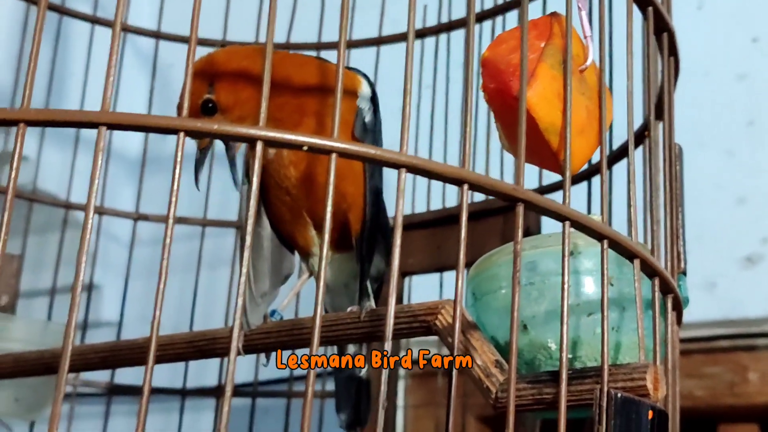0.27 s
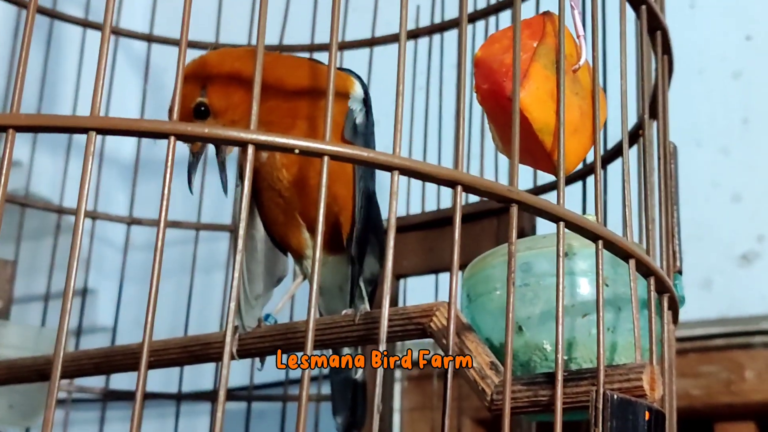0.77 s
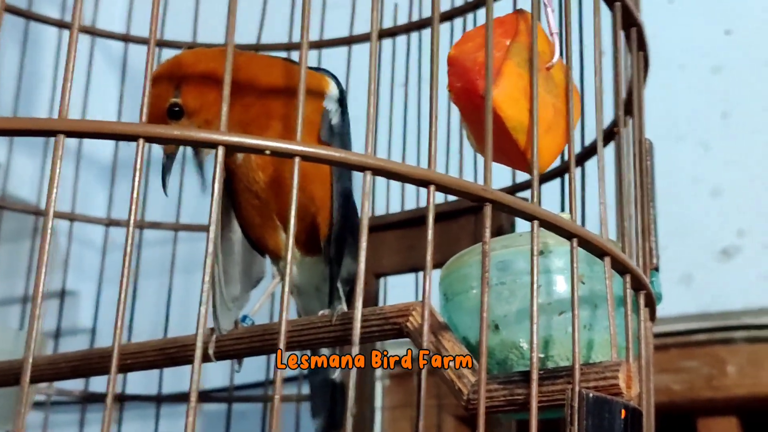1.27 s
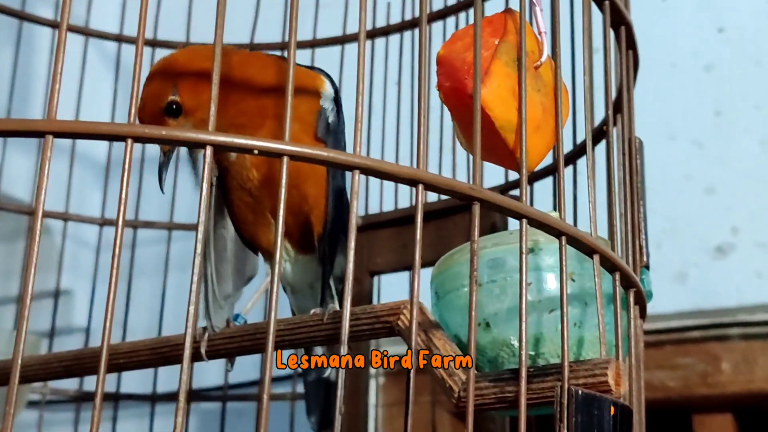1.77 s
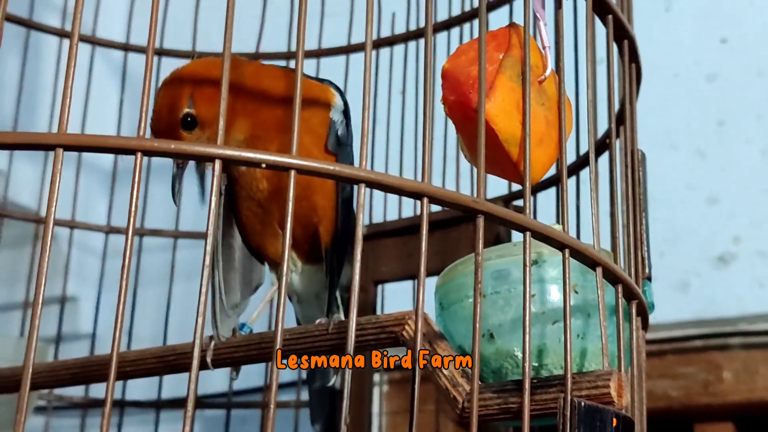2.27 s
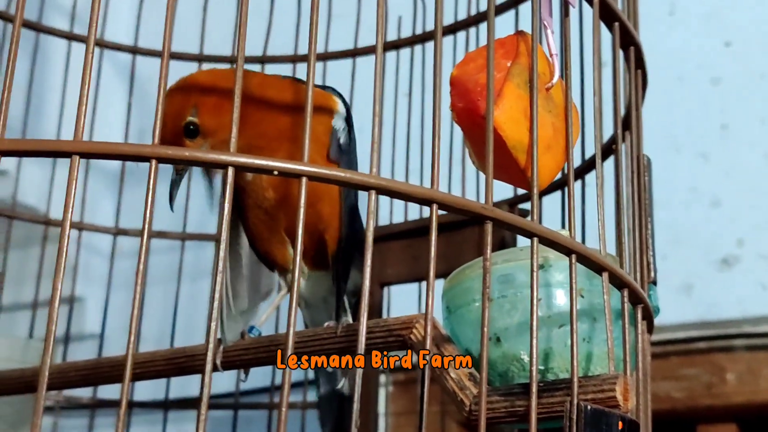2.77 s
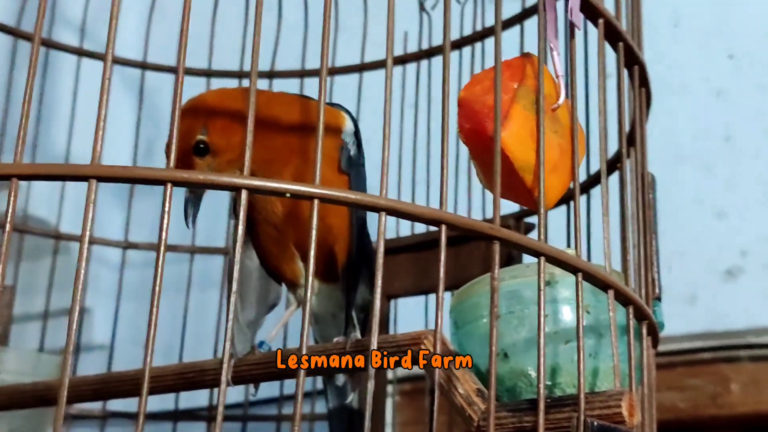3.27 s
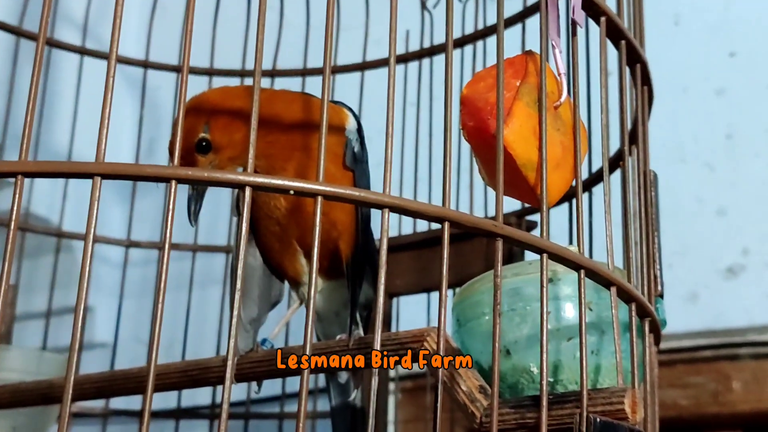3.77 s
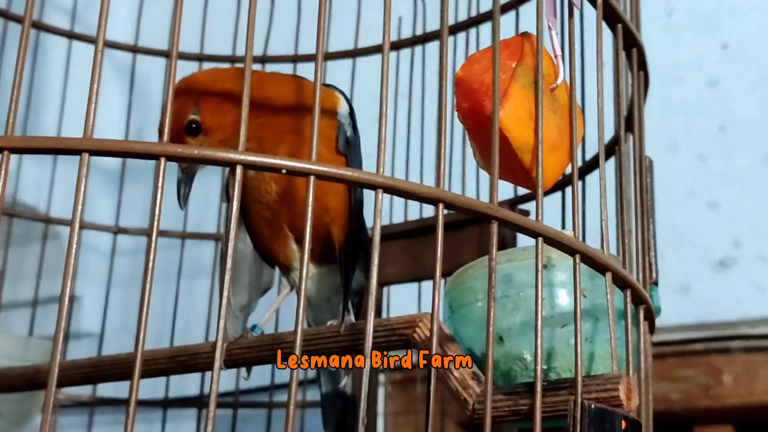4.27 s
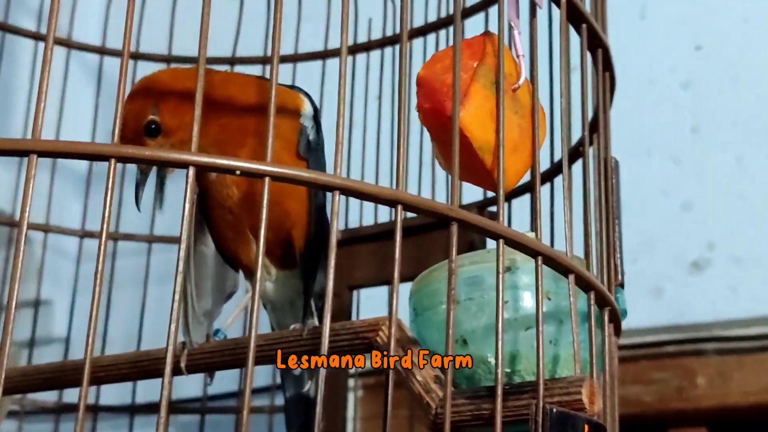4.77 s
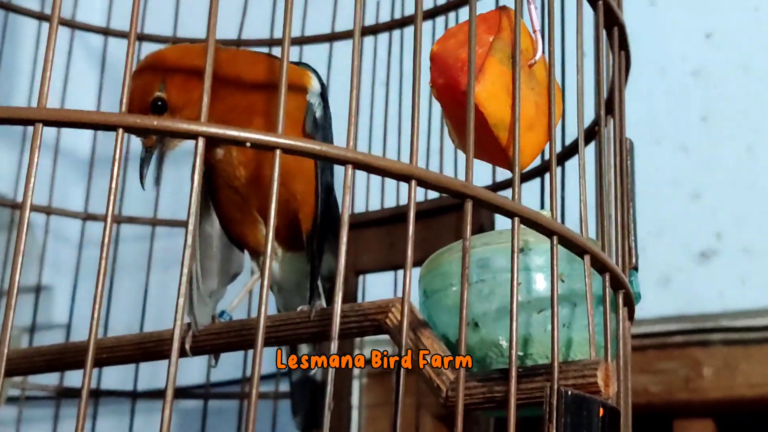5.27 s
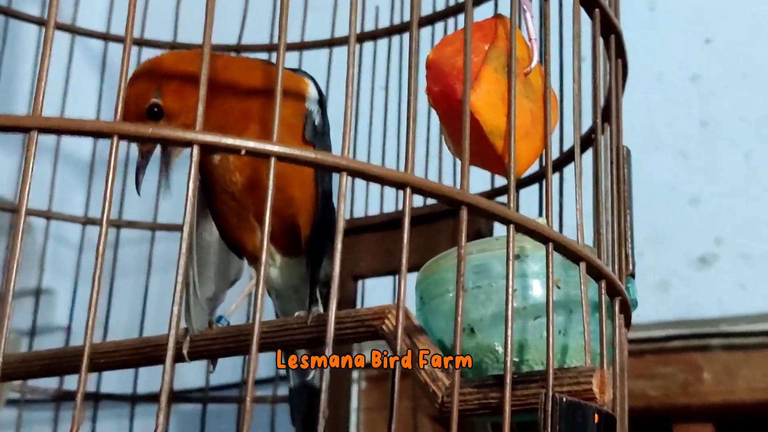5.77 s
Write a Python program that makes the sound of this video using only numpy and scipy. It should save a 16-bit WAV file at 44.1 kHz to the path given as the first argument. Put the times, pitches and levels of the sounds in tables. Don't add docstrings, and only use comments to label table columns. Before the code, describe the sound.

Loud, sharp thrush song with gaps: sliding whistles, quick clicking chips, warbled buzzes and husky downward slurs, with a short hard-room ring.

```python
import sys
import numpy as np
from scipy import signal
from scipy.fft import rfft, irfft, next_fast_len
from scipy.io import wavfile
from scipy.ndimage import uniform_filter1d, minimum_filter1d

SR = 44100
rng = np.random.default_rng(int(sys.argv[2]) if len(sys.argv) > 2 else 0)


def unload_wav(signal):
    wavfile.write(
        sys.argv[1],
        SR,
        np.round(np.clip(np.atleast_2d(signal).T, -1, 1) * 32767).astype(np.int16),
    )


def linear_from_db(decibels):
    return 10 ** (np.asarray(decibels, float) / 20)


N = 265702
RUN_IN = SR // 10

# time_s, pitch_hz, effort_db
SLUR = [(0, 4070, -30), (.018, 3970, -12.5), (.035, 3780, -12.5), (.085, 3560, -12.5), (.135, 3330, -10),
        (.182, 3286, -9.5), (.207, 2980, -13.5), (.221, 2300, -23)]
LEVEL_SLUR = [(0, 4150, -25.5), (.012, 3920, -11), (.053, 3670, -12.5), (.093, 3510, -11.5),
              (.133, 3362, -10), (.178, 3300, -9.5), (.208, 3200, -12), (.228, 2900, -24.5)]
KINKED_SLUR = [(0, 4090, -25.5), (.011, 3767, -16.5), (.021, 3782, -12), (.033, 3523, -14),
               (.09, 3333, -8.5), (.14, 3330, -9.5), (.175, 3195, -7.5), (.192, 3112, -19)]
# time_s, pitch_hz, effort_db
THIN_VOICE = [(0, 7780, -17.5), (.04, 7890, -27), (.077, 7480, -14)]
BEATING_VOICE = [(0, 6828, -22), (.03, 7060, -3), (.065, 6820, -18.5)]
# time_s, pitch_hz, effort_db
PEEP = [(0, 4760, -13.5), (.02, 4840, -0.5), (.036, 4720, -7.5), (.05, 4460, -8.5)]
HOOK = [(0, 3650, -11.5), (.012, 3950, -7), (.03, 4190, -0.5), (.047, 4120, -4), (.062, 3500, -6),
        (.082, 2434, -17.5)]
SHORT_HOOK = [(0, 4200, -7.5), (.012, 4350, -10.5), (.037, 4330, -1.5), (.047, 4150, -4), (.058, 3540, -3),
              (.069, 2800, -17.5)]
BUZZ = [(0, 3925, -22), (.012, 4226, -13), (.045, 4286, -5.5), (.09, 4390, -2), (.125, 4400, -19)]
RATTLE = [(0, 6390, -18.5), (.012, 5730, -9), (.037, 5694, -3.5), (.067, 6160, -6.5), (.094, 6570, -10.5)]
# time_s, pitch_hz, effort_db
GASP = [(0, 3050, -35), (.02, 2786, -33.5), (.045, 2700, -37)]
# time_s, pitch_hz, effort_db
RISE = [(0, 6190, -20.5), (.012, 6535, -4.5), (.033, 6950, -5.5), (.038, 7700, -16)]
DROP = [(0, 6140, 0.5), (.004, 5150, -22), (.008, 3190, -22)]
LONG_WHISTLE = [(0, 9100, -14), (.012, 8600, -10), (.029, 7964, -3.5), (.074, 7672, -4), (.114, 7540, -7),
                (.142, 7410, -16.5)]
DIVE = [(0, 7383, -12.5), (.023, 6878, -3.5), (.063, 6314, -5.5), (.103, 5900, -11), (.123, 5660, -9.5),
        (.135, 4577, -10.5), (.149, 3232, -16)]
SCOOP = [(0, 3220, -10), (.02, 2882, -0.5), (.055, 2890, -5), (.075, 3984, 4), (.105, 4704, -13.5),
         (.145, 5130, -16), (.18, 5200, -28.5)]
# time_s, pitch_hz, effort_db
UPSTROKE = [(0, 4790, -10.5), (.004, 6910, -13.5), (.008, 7300, -17.5)]
TICK = [(0, 7150, -20), (.002, 7294, -15.5), (.004, 7500, -25.5)]
DOWNSTROKE = [(0, 6820, -0.5), (.01, 7540, -6), (.018, 5660, -8), (.027, 4620, -4.5)]
ARCH = [(0, 4565, -9), (.007, 6400, -16), (.013, 7150, -3), (.019, 6520, -9.5), (.025, 5090, -1),
        (.033, 3500, -14.5)]
VEE = [(0, 6830, -28), (.0025, 5820, -7), (.0055, 3773, -12.5), (.009, 3594, -10.5), (.013, 4500, -20),
       (.018, 5300, -12.5)]
FLICK = [(0, 4290, -27), (.018, 4330, -13), (.06, 4401, -9), (.088, 4405, -6.5), (.11, 4640, -3),
         (.127, 5450, -11.5)]


def at_hz(points, hz):
    table_hz, value = np.transpose(points)
    return np.interp(np.log(hz + 1), np.log(table_hz), value)


def rms_one(x):
    return x / np.sqrt(np.mean(x ** 2) + 1e-20)


def lowpass(x, order, hz):
    return signal.sosfilt(signal.butter(order, hz, fs=SR, output="sos"), x)


def wobble(size, hz):
    return rms_one(lowpass(rng.standard_normal(size + 2000), 2, hz)[2000:])


def warble(pitch, t, share):
    # one_dip_s, rate_hz, depth_at_start (share of pitch), depth_at_end (share of pitch)
    warbles = [
        (1.743, 71, 0.074, 0.055),
        (4.6191, 52.5, 0.13, 0.034),
        (4.7742, 55.1, 0.035, 0.083),
    ]
    for dip_s, rate_hz, first, last in warbles:
        if t[0] < dip_s < t[-1]:
            turn = 2 * np.pi * rate_hz * (t - dip_s)
            skewed_turn = turn / 2 + 0.25 * (1 - np.cos(turn))
            dips = 1 - 2 * abs(np.sin(skewed_turn)) ** 1.3
            pitch = pitch * (1 - (first + (last - first) * share) * dips)
    return pitch


def partial(k, db, pitch, phase):
    # frequency_hz, gain_db
    throat_gain = [(2000, -16.5), (3300, -16), (4300, -11.5), (5500, -1.5), (6800, -0.5), (8500, -8.5),
                   (11500, -15.5), (15500, -13)]
    audible = k * pitch < 0.4 * SR
    return linear_from_db(db + at_hz(throat_gain, k * pitch)) * np.sin(k * phase) * audible


def note(gesture, start_s, stretch, ratio, level_db, upper_db, half_db=(), half_from=0, fade_db=0, rough=0):
    time_s, pitch_hz, effort_db = np.transpose(gesture)
    s = start_s + stretch * (time_s - time_s[0])
    length_s = s[-1] - s[0]
    t = np.arange(round(s[0] * SR), round(s[-1] * SR)) / SR
    share = (t - s[0]) / length_s
    effort = level_db + np.interp(t, s, effort_db)

    pitch = ratio * np.interp(t, s, pitch_hz)
    pitch = uniform_filter1d(pitch, size=1 + int(0.07 * len(t)), mode="nearest")
    pitch = warble(pitch, t, share)
    shake = wobble(SR // 3, 420)[:len(t)]
    flutter = wobble(SR // 3, 150)[:len(t)]
    phase = 2 * np.pi * np.cumsum(pitch * (1 + 0.19 * rough * shake)) / SR

    dulling, breakup_db = 0.1, 1.28
    tilt_db = dulling * (effort - effort.max()) + breakup_db * shake
    tone = 0
    for k, db in enumerate((0, *upper_db)):
        tone = tone + partial(k + 1, db + k * tilt_db, pitch, phase)

    doubling = linear_from_db(fade_db * share) * np.clip((share - half_from) / 0.03, 0, 1)
    for k, db in enumerate(half_db):
        tone = tone + doubling * partial(k + 0.5, db, pitch, phase)

    attack_s, release_s = 0.0016, min(0.0011, 0.34 * length_s)
    opening = np.minimum((t - s[0]) / attack_s, (s[-1] - t) / release_s)
    edges = np.sin(np.pi / 2 * np.clip(opening, 0, 1)) ** 2
    return tone * edges * linear_from_db(effort + 1.19 * flutter)


def thrush():
    # upper_db
    # (partials 2-4), half_db (lines at .5-3.5 x pitch), half_from (share of note), fade_db (of half lines),
    # rough (hoarseness), air_db (under the tone)
    songs = [
        (SLUR, dict(upper_db=(-3.5, -12, -7), half_db=(-14, -9.5, -18, -3), half_from=0.12, fade_db=-23, rough=0.021, air_db=-22.5), [(.165, 1.07, 0.98, 0)]),
        (LEVEL_SLUR, dict(upper_db=(-2.5, -7, -5), half_db=(-11.5, -6.5, -13, -3.5), half_from=.05, fade_db=-31.5, rough=0.027, air_db=-19.5), [(.567, 1.0, 0.99, 0)]),
        (KINKED_SLUR, dict(upper_db=(-4, -5, -4), half_db=(-9, 3, 1, 3), half_from=0.053, fade_db=-92, rough=.04, air_db=-20), [(5.113, 1.02, .99, 0.057), (5.462, .99, 1.01, 0)]),
        (THIN_VOICE, dict(upper_db=(-28,), rough=0.0799, air_db=-9), [(5.165, .98, 1.0, 0.5), (5.51, 1.03, 1.0, -3)]),
        (BEATING_VOICE, dict(upper_db=(-3,), rough=0.035, air_db=-39.5), [(5.225, 0.77, 0.91, 0), (5.588, .9, .99, 1)]),
             (PEEP, dict(upper_db=(-11.5, -14.5), half_db=(-36.5, -41, -34), half_from=0.43, fade_db=6, air_db=-38), [(.87, 0.82, 1.013, -13.5, 9.5), (1.025, 1.2, 0.98, -2, 11), (5.787, 0.94, 1.042, 1, -25), (5.908, 1.13, .96, 1.5, -6.5)]),
        (HOOK, dict(upper_db=(-19, -13, -27), rough=0.022, air_db=-25), [(1.28, 1.046, 1.0, 2, 5), (1.418, 1.02, .985, 2.5, -5.5)]),
        (SHORT_HOOK, dict(upper_db=(-18.5, -9.5, -17), rough=0.0101, air_db=-22), [(1.153, 0.98, 1.0, 0, 0.015)]),
        (BUZZ, dict(upper_db=(-20.5, -23.5, -30), rough=.03, air_db=-20), [(4.575, 0.95, 0.98, 0.5, .1), (4.747, 0.63, 0.81, -3, .1)]),
        (RATTLE, dict(upper_db=(-4,), half_db=(-25.5, -45), half_from=.2, fade_db=-10, rough=.03, air_db=-29), [(1.718, 0.91, 1.0, 0.013, 0)]),
             (RISE, dict(upper_db=(-4.5,), rough=.05, air_db=-34.5), [(1.577, 1.0, 1.0, 0)]),
        (DROP, dict(upper_db=(2.5, -3.5, -3), air_db=-28.5), [(1.615, 0.98, 0.92, 0.011)]),
        (LONG_WHISTLE, dict(upper_db=(-5.5,), rough=0.0092, air_db=-56), [(1.926, 1.0, 1.0, 0.0072)]),
        (DIVE, dict(upper_db=(-6.5, -23, -23), air_db=-38.5), [(2.187, 1.0, 1.0, 0.0059)]),
        (SCOOP, dict(upper_db=(-34, -45, -33), air_db=-18.5), [(2.335, 1.0, 1.0, 0.003)]),
             (UPSTROKE, dict(upper_db=(-7,), air_db=-16.5), [(2.528, 2.24, 1.03, -2), (2.767, 1.5, 1.03, 1.8)]),
        (TICK, dict(upper_db=(-6,), rough=.03, air_db=-14.5), [(2.793, 1.66, 0.81, 13), (2.856, 1.0, 1.05, 3), (2.939, 1.1, 1.03, 5), (4.601, 2.7, 0.685, -2)]),
        (TICK, dict(upper_db=(-29,), rough=0.057, air_db=-26.5), [(2.689, 3.0, .5, 8)]),
             (DOWNSTROKE, dict(upper_db=(-2, -13), rough=0.046, air_db=-11), [(2.547, 1.0, 0.93, 0.0058, 0.0051)]),
        (ARCH, dict(upper_db=(-6, -8.5, -12), rough=0.097, air_db=-6.5), [(2.655, 0.97, 0.99, 0, 0.0051)]),
        (VEE, dict(upper_db=(2, -5.5, 4.5), rough=0.1, air_db=-17), [(2.785, 0.72, 1.0, 1.5, .1), (2.868, 0.84, 1.04, 2.5, .1), (2.95, 0.9, 1.03, 0.5, .1), (3.037, .9, 1.0, -2, .1), (3.128, 1.05, 1.016, -2, .1)]),
        (FLICK, dict(upper_db=(-15.5, -12), half_db=(1, -13, -7.5, -15), half_from=0.013, fade_db=-5, rough=.01, air_db=-19.5), [(4.911, 0.97, 0.99, 0, 0)]),
        (PEEP, dict(upper_db=(-3, -8), half_db=(-5.5, -13), half_from=.01, fade_db=-5.5, rough=0.2, air_db=-9), [(-0.055, .85, 1.06, -5.5)]),
        (GASP, dict(upper_db=(-7,), rough=0.49, air_db=11.5), [(1.915, 0.95, 0.92, 0, 0)]),
    ]
    # frequency_hz, gain_db
    air_color = [(1500, -26), (2500, -8), (3500, -12), (4600, -26.5), (6000, -4), (7500, 0.1), (9000, -15),
                 (11000, -7.5), (13500, -2.5), (16000, -3)]
    tones, air = np.zeros((2, N + RUN_IN))
    for gesture, voice, sung in songs:
        tone_voice = {name: value for name, value in voice.items() if name != "air_db"}
        for start_s, stretch, ratio, level_db, *extra_air_db in sung:
            tone = note(gesture, start_s, stretch, ratio, level_db, **tone_voice)
            at = round(start_s * SR) + RUN_IN
            tones[at:at + len(tone)] += tone
            breath = uniform_filter1d(abs(tone), size=60)
            air[at:at + len(tone)] += linear_from_db(voice["air_db"] + sum(extra_air_db)) * breath
    size = next_fast_len(len(air))
    color = linear_from_db(at_hz(air_color, np.fft.rfftfreq(size, 1 / SR)))
    rush = irfft(rfft(rng.standard_normal(size)) * color, size)
    return tones + air * rms_one(rush)[:len(air)]


def room(x):
    # frequency_hz, t60_s
    decay_t60 = [(2000, 0.39), (4000, 0.36), (7000, .33), (11000, 0.31), (15000, 0.26)]
    # frequency_hz, gain_db
    left_shade = [(2200, -3), (3200, 1), (4500, -8.5), (6500, -10.5), (9000, -7.5), (12000, -6),
                  (15000, -9.5)]
    # frequency_hz, lead_rad
    left_turn = [(500, 1.1), (2100, 2.05), (3200, 1.9), (4700, 4.43), (8000, 8.35), (12000, 13.25),
                 (16000, 16.1)]
    tail_db, left_tail_db, first_echo_s = -1.5, -1, 0.0011
    t = np.arange(SR // 2) / SR
    white = rng.standard_normal((2, len(t)))
    tail = 0
    edges = np.geomspace(1200, 19000, 9)
    for low, high in zip(edges, edges[1:]):
        band = signal.sosfilt(signal.butter(2, [low, high], "band", fs=SR, output="sos"), white)
        tail = tail + band * linear_from_db(-60 * t / at_hz(decay_t60, np.sqrt(low * high)))
    tail = tail * np.clip(t / first_echo_s - 1, 0, 1)
    tail = tail / np.sqrt(np.sum(tail ** 2, 1, keepdims=True))
    tail = tail * linear_from_db([[tail_db + left_tail_db], [tail_db]])

    size = next_fast_len(len(x) + len(t))
    hz = np.fft.rfftfreq(size, 1 / SR)
    lead = np.exp(1j * np.interp(hz, *np.transpose(left_turn)))
    paths = rfft(tail, size) + [lead, np.ones_like(lead)]
    paths[0] *= linear_from_db(at_hz(left_shade, hz))
    return irfft(rfft(x, size) * paths, size)[:, RUN_IN:RUN_IN + N]


def hum():
    # frequency_hz, level_db (rms)
    hum_lines = [(177.6, -74.5), (247.6, -62.5), (285.3, -67.5), (323.0, -68.5), (355.3, -70.5),
                 (1324, -110)]
    t = np.arange(N) / SR
    total = np.zeros(N)
    for hz, db in hum_lines:
        level = linear_from_db(db + 2.0 + 2.4 * wobble(N, 2.2))
        total += level * np.sin(2 * np.pi * hz * t + 1.5 * wobble(N, 3.0))
    return total


def hiss():
    # frequency_hz, level_db (per Hz)
    floor_color = [(12, -37.5), (20, 7), (120, -14.5), (168, -17.5), (216, -15), (248, -12), (399, -17),
                   (434, -19), (660, -19.5), (1960, -26), (4180, -32.5), (5530, -37.5), (7110, -31),
                   (8410, -46.5), (16000, -37)]
    # frequency_hz, likeness (0-1)
    port_likeness = [(60, 0.093), (130, 0.93), (290, 0.66), (640, 0.24), (1400, 0.012)]
    hz = np.fft.rfftfreq(N, 1 / SR)
    mid, side = rfft(rng.standard_normal((2, N))) * linear_from_db(at_hz(floor_color, hz))
    alike = np.clip(at_hz(port_likeness, hz), 0, 1)
    pair = irfft(np.sqrt(1 + alike) * mid + np.sqrt(1 - alike) * side * [[1], [-1]], N)
    level_db = np.array([[-54 + 0.4], [-54 - 0.4]])
    return linear_from_db(level_db) * pair / np.std(pair.mean(0))


def puffs():
    # time_s, peak_db, length_s, top_hz
    air_puffs = [
        (1.955, -26.5, 0.0053, 393),
        (1.973, -29, 0.0069, 1190),
        (1.987, -28.5, 0.002, 1500),
        (2.003, -33.5, 0.008, 500),
        (2.05, -52, 0.0051, 298),
        (5.123, -33.5, 0.0033, 800),
        (5.243, -37.5, 0.0082, 586),
        (1.617, -38.5, 0.0049, 600),
        (1.784, -36.5, 0.0034, 602),
    ]
    out = np.zeros(N)
    t = np.arange(2000) / SR
    for time_s, peak_db, length_s, top_hz in air_puffs:
        swell = np.exp(-((t - 2 * length_s) / length_s) ** 2)
        burst = lowpass(rng.standard_normal(2000) * swell, 2, top_hz)
        at = round((time_s - 2 * length_s) * SR)
        out[at:at + 2000] += linear_from_db(peak_db) * burst / np.max(abs(burst))
    return out


def scene():
    return room(thrush()) + hiss() + hum() + puffs() * linear_from_db([[-30], [0]])


def overload(x):
    hot = signal.lfilter(*signal.iirpeak(8500, 8, fs=SR), x)
    sag = lowpass(hot ** 2, 1, 10)
    sag = lowpass(sag + 0.07 * hot ** 2, 2, 180)
    sag = signal.sosfilt(signal.cheby1(2, 0.5, 3, "high", fs=SR, output="sos"), sag)
    return x - linear_from_db([[12], [19]]) * sag


def limiter(x):
    ceiling = 0.9
    duck = minimum_filter1d(np.minimum(1, ceiling / (abs(x) + 1e-9)), size=181)
    return x * uniform_filter1d(duck, size=91)


def low_pass(x):
    return signal.sosfilt(signal.butter(12, 16490, fs=SR, output="sos"), x)


def record(dry):
    x = limiter(overload(dry))
    mix = signal.sosfilt(signal.cheby2(10, 60, 16700, fs=SR, output="sos"), x)
    return low_pass(mix)


dry = scene()
out = record(dry)
unload_wav(out)
```